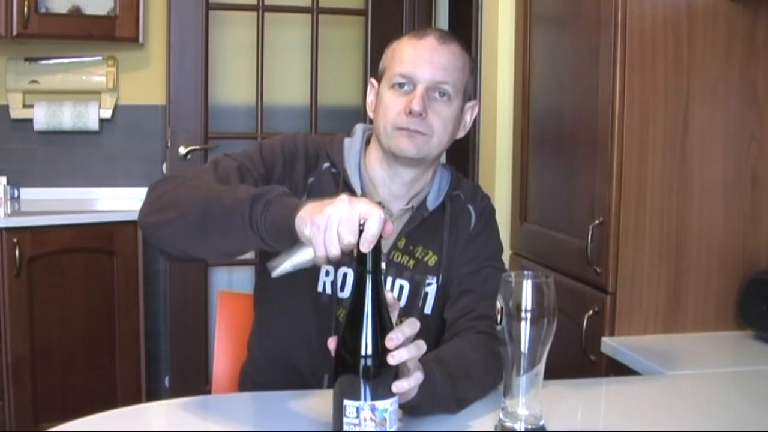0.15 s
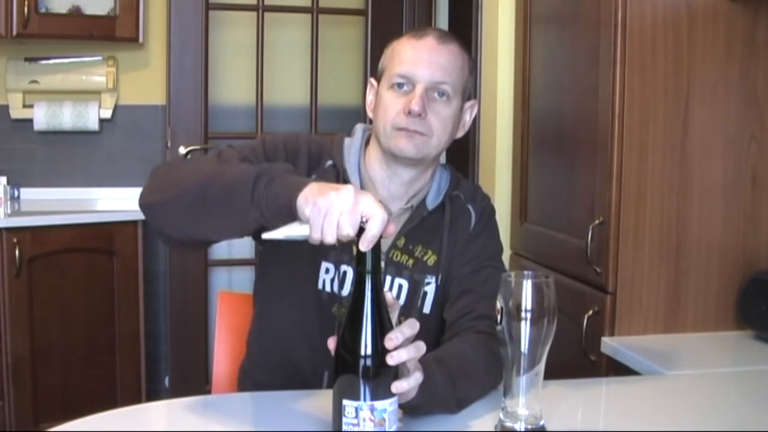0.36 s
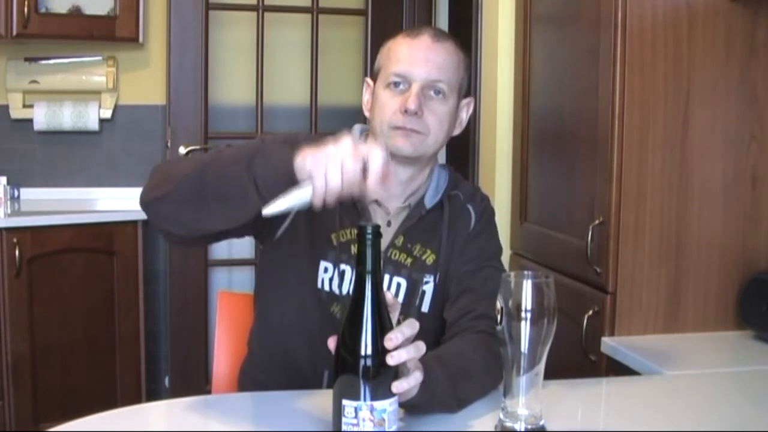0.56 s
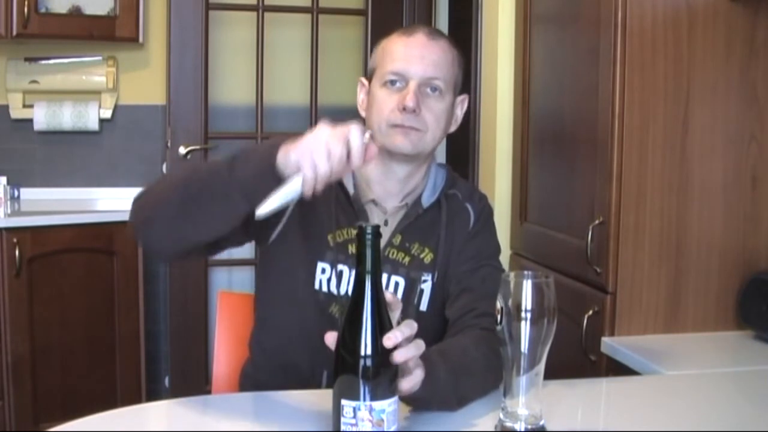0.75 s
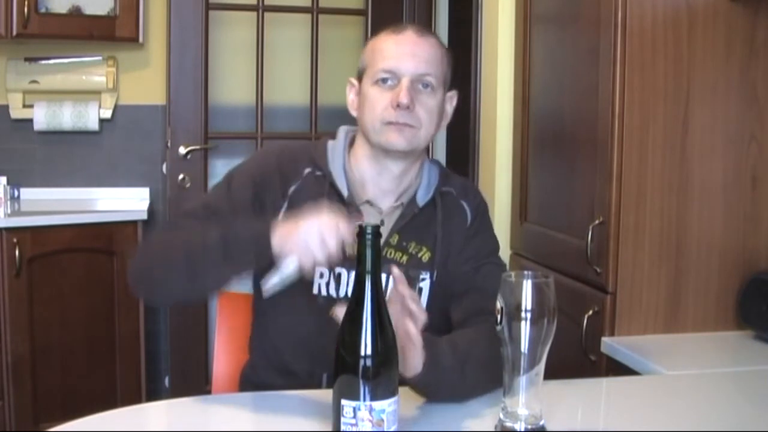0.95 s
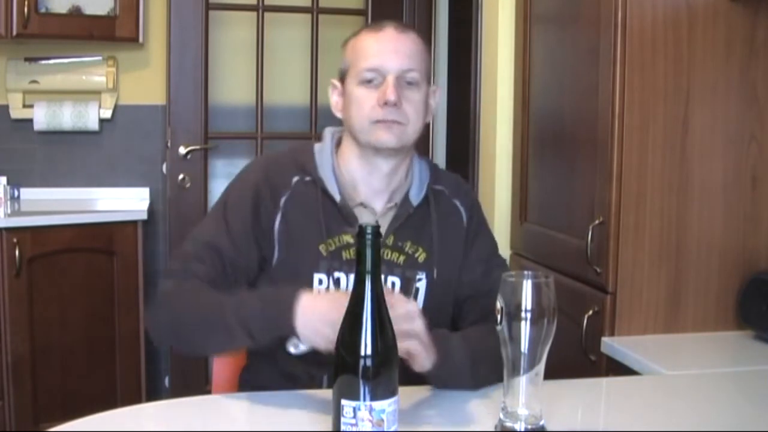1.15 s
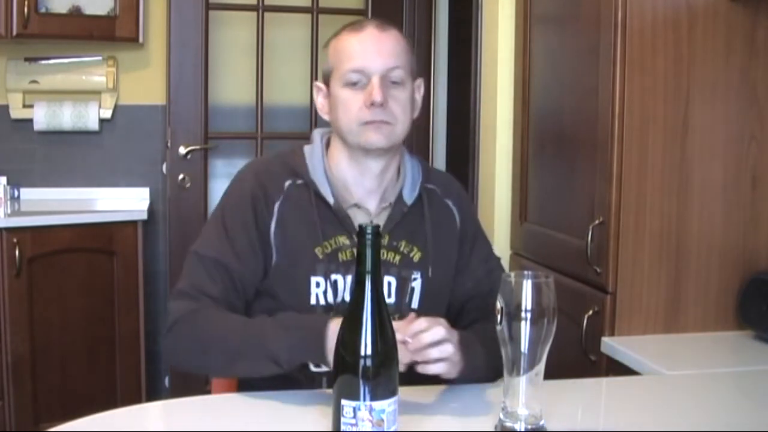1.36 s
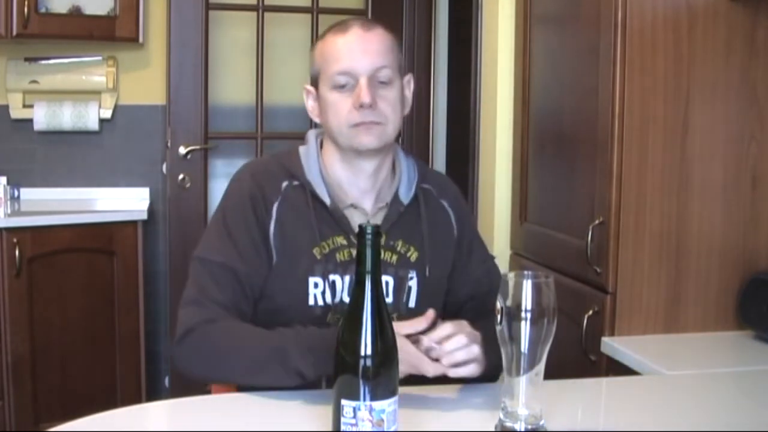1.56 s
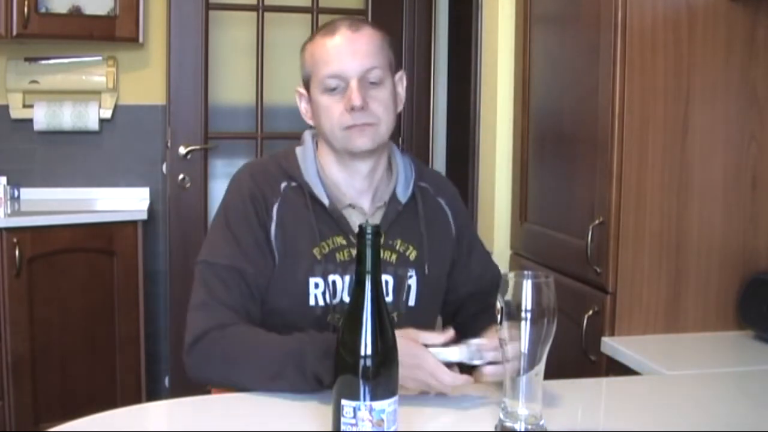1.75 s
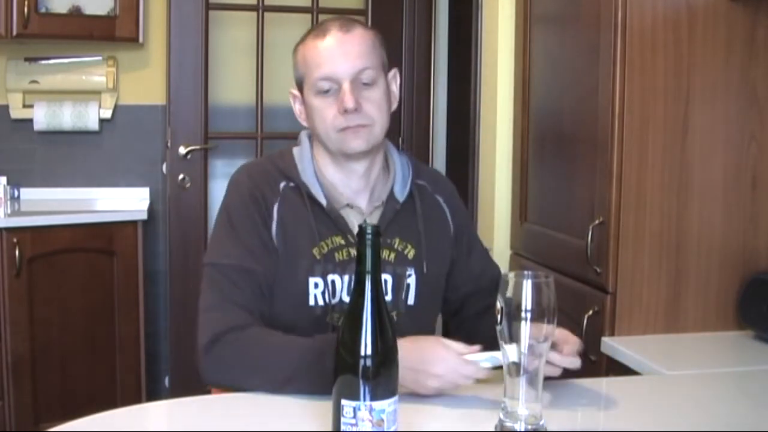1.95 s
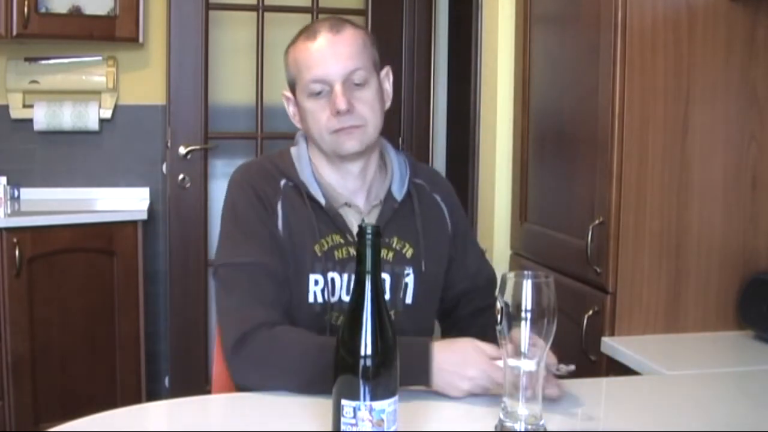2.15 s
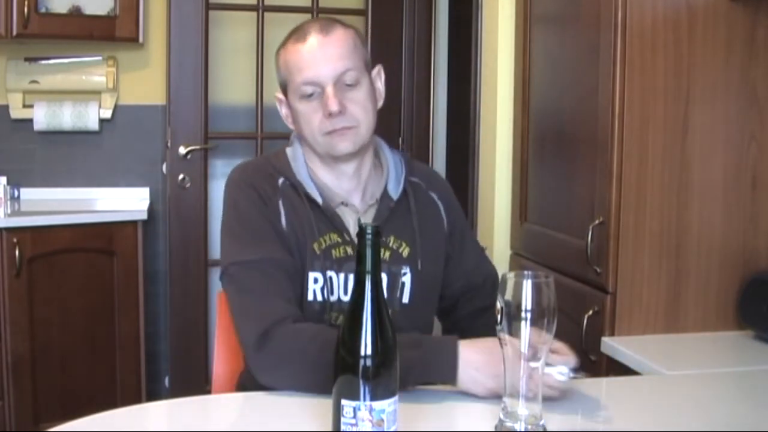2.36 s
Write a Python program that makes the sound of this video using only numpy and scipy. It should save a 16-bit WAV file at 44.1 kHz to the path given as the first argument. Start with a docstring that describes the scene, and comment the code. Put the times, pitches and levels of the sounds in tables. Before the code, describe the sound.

Sharp bottle-opening pop with a gassy burst, followed by small metallic clicks and a table clack

```python
"""A hard-walled kitchen: a crown cap pops off a glass bottle, clicks against the opener and is put down.
Gas and contacts are shaped noise and impulses ringing resonances; the walls answer each as decaying noise.
Above the bass and below the top treble the walls outweigh the direct sound at the stereo microphone.
Behind: a low thump, a sliding opener, sleeve rustle, soft low swells and the hum of a fridge and the camera.
The camera's limiter squeezes the pop."""
import sys
import numpy as np
from scipy import signal
from scipy.fft import rfft, irfft, next_fast_len
from scipy.io import wavfile
from scipy.ndimage import uniform_filter1d, map_coordinates

SR = 44100
rng = np.random.default_rng(int(sys.argv[2]) if len(sys.argv) > 2 else 0)


def materialize(psi):
    """Save the field psi as 16-bit PCM at rate SR to the path in sys.argv[1].

    A 1-D psi becomes a single channel; in a 2-D psi each row is a channel.
    """
    bounded = np.clip(np.atleast_2d(psi).T, -1, 1)
    quanta = np.round(bounded * 32767).astype(np.int16)
    wavfile.write(sys.argv[1], SR, quanta)


def volts_from_db(level):
    """Convert decibel levels to linear amplitude ratios."""
    exponent = np.asarray(level, float) / 20
    return 10 ** exponent


N = 110250
T = np.arange(N) / SR
POP_S = 0.2486  # moment the cap lets go


def unit(x):
    """Scale to rms 1."""
    return x / np.sqrt(np.mean(x ** 2) + 1e-20)


def along(points, hz):
    """Interpolate (frequency [Hz], value) points on a log frequency axis."""
    f, value = np.transpose(points)
    return np.interp(np.log(hz + 1), np.log(f + 1), value)


def filtered(x, response):
    """Multiply the spectrum of x by a response of frequency."""
    m = next_fast_len(x.shape[-1] + SR // 4)
    spectrum = rfft(x, m) * response(np.fft.rfftfreq(m, 1 / SR))
    return irfft(spectrum, m)[..., :x.shape[-1]]


def causal(gain):
    """Minimum-phase response with this gain: its sound never precedes the impulse."""
    def response(hz):
        cepstrum = irfft(np.log(gain(hz) + 1e-6))
        half = len(cepstrum) // 2
        folded = np.concatenate([cepstrum[:1], 2 * cepstrum[1:half], 0 * cepstrum[half:]])
        return np.exp(rfft(folded, len(cepstrum)))[:len(hz)]
    return response


def resonances(rows):
    """Sum of band-pass resonances with alternating signs."""
    def response(f):
        total = 0
        for k, (centre, width, db) in enumerate(rows):
            total = total + (-1) ** k * volts_from_db(db) * 1j * f * width / (centre * centre - f * f + 1j * f * width)
        return total
    return response


def ringing(rows):
    """Causal body whose resonances add in power and fall steeply outside."""
    def gain(f):
        power = 0
        for centre, width, db in rows:
            # each resonance is squared, which narrows it: widen it and halve its dB first
            power = power + np.abs(resonances([(centre, 1.5 * width, db / 2)])(f)) ** 4
        return np.sqrt(power)
    return causal(gain)


def even(x):
    """Smooth away the chance notches of a short burst, causally."""
    m = next_fast_len(8 * len(x))
    size = np.abs(rfft(x, m))
    floor = 0.38 * size.mean()
    return filtered(x, causal(lambda hz: 1 / np.interp(hz, np.fft.rfftfreq(m, 1 / SR), size + floor)))


def pair(x, alike, colour_db):
    """Mix two coloured noises to left and right with the given likeness (correlation) by frequency."""
    def spread(hz):
        turn = np.arccos(np.clip(along(alike, hz), -1, 1)) / 2
        return volts_from_db(colour_db(hz)) * [np.cos(turn), np.sin(turn)]
    mid, side = filtered(x, spread)
    return np.array([mid + side, mid - side])


def hit(db, response):
    """One sharp contact with a faint rattle, through a body that takes a moment to speak."""
    rattle_db, contact_t60_s, contact_rise_s = -13, 0.0058, 0.00016
    t = T[:SR // 20]
    rattle = volts_from_db(rattle_db - 60 * t / contact_t60_s) * rng.standard_normal(len(t))
    push = even((t == 0) + rattle)
    push = push / np.linalg.norm(push)
    # the level is the peak that a bare impulse would give
    peak = np.abs(filtered(1. * (t == 0), response)).max()
    return volts_from_db(db) * filtered(push, response) * (1 - np.exp(-t / contact_rise_s)) / peak


# spectrum of the escaping gas: (frequency [Hz], relative density [dB per Hz])
GAS_COLOUR = [(24, -80.5), (40, -19.5), (130, -15.5), (171, -7), (305, -13.5), (733, -9.5), (918, -18),
              (1090, -7.5), (2150, -8.5), (2630, -1.5), (3560, -7), (9690, -5.5), (16000, -23.5)]
# bottle resonances: (frequency [Hz], width [Hz], level over the gas [dB])
BOTTLE_RESONANCES = [(175, 22, 3.5), (251, 10, 7), (474, 20, 5.5), (720, 98, 8.5), (1053, 47, 10.5),
                     (2003, 110, 9), (2627, 26, 12.5), (3135, 300, 0), (4090, 170, 2.5), (5700, 340, -1.5)]


def pop():
    """Gas bursts out under the cap as decaying noise and sets the bottle ringing."""
    level_db, rise_s, t60_s = -1, 0.0005, 0.05  # level: rms where the envelope is 1
    lead_s = 8 * rise_s  # room for the onset
    t = T[:SR // 10] - lead_s
    burst = volts_from_db(-60 * np.maximum(t, 0) / t60_s) / (1 + np.exp(-t / rise_s))

    def colour(hz):
        # less the walls' colour, which their answer brings back
        gas = volts_from_db(along(GAS_COLOUR, hz) - along(WALL_LEVEL, hz))
        return gas * (1 + np.abs(resonances(BOTTLE_RESONANCES)(hz)))

    gas = filtered(even(rng.standard_normal(len(t)) * burst), causal(colour))
    gas = gas / np.sqrt(np.sum(gas ** 2) / np.sum(burst ** 2))
    out = np.zeros((2, N))
    place_in_kitchen(out, POP_S - lead_s, volts_from_db(level_db) * gas)
    return out


def thump():
    """Low push of the released pressure: a heavily damped swing."""
    hz, level_db, t60_s = 85, -26.5, 0.12
    t = np.maximum(T - POP_S, 0)
    return volts_from_db(level_db - 60 * t / t60_s) * np.sin(2 * np.pi * hz * t)


# cap clicking on steel, direct sound:
# (time [s], nominal peak level [dB], dull knock [dB], middle modes [dB], high modes [dB])
CAP_CLICKS = [(0.8357, -44.5, -3, -7.5, -8.5), (1.0073, -40, -12.5, -8.5, -12.5),
              (1.049, -43, -5, -14, -28), (1.0962, -27.5, -10, -10.5, -7.5),
              (1.1578, -28.5, -10.5, -13.5, -17.5), (1.1656, -32, -7, -3.5, -5),
              (1.1782, -32.5, -14.5, -6.5, -11.5), (1.3136, -23.5, -25.5, -12.5, -9.5),
              (1.3206, -25.5, -12, -10, -4.5), (1.3998, -35.5, -21, -0.5, -7), (1.5696, -54, -8, 5, 6.5)]
# cap modes in four groups, knock, low, middle, high: (frequency [Hz], width [Hz], level [dB])
CAP_MODES = [
    [(1640, 650, -0.5)],
    [(2090, 360, -2), (2642, 260, 1.5), (3210, 400, -3)],
    [(4190, 990, 0.5), (4840, 380, 4)],
    [(7600, 720, 1), (8400, 330, 3), (11100, 850, -10), (13000, 690, -8.5)],
]
# cap lands on the table and rocks, direct sound: (time [s], nominal peak level [dB])
CAP_LANDINGS = [(2.2442, -10.5), (2.2664, -33.5)]
# modes heard at the landing: (frequency [Hz], width [Hz], level [dB])
LANDING_MODES = [(900, 220, -19), (1566, 430, -11), (2110, 500, -10.5), (2880, 1040, -5), (3860, 560, -1.5),
                 (4550, 480, -1), (4910, 320, 2), (6500, 360, -4), (7680, 916, 2), (9800, 1600, -13),
                 (11600, 910, -13.5)]


def cap():
    """Each click rings the cap's mode groups with its own strengths; landing rings its own modes."""
    out = np.zeros((2, N))
    for time_s, db, knock_db, middle_db, high_db in CAP_CLICKS:
        rows = []
        for group, extra_db in zip(CAP_MODES, (knock_db, 0, middle_db, high_db)):
            for hz, width, mode_db in group:
                rows.append((hz, width, mode_db + extra_db + rng.normal(0, 1)))
        place_in_kitchen(out, time_s, hit(db, ringing(rows)))
    for time_s, db in CAP_LANDINGS:
        place_in_kitchen(out, time_s, hit(db, ringing(LANDING_MODES)))
    return out


# spectrum of the sliding opener: (frequency [Hz], relative density [dB per Hz])
SLIDE_SPECTRUM = [(1470, -38), (2500, -17.5), (3430, -6.5), (4070, -12.5), (6060, -3), (10500, -15),
                  (15000, -30.5)]
# opener taps, direct sound: (time [s], nominal peak level [dB], low body [dB])
OPENER_TAPS = [(1.9438, -28, -11), (1.9485, -21.5, 4)]
# low body and bright ring of a tap: (frequency [Hz], width [Hz], level [dB])
TAP_LOW_MODES = [(800, 340, -14), (1414, 930, -1)]
TAP_BRIGHT_MODES = [(3440, 1200, -7.5), (5270, 1000, 0.5), (7230, 1600, 2), (8350, 910, -0.5),
                    (12100, 1800, -6.5)]


def opener():
    """A short swelling slide of grainy rubbing noise that ends in two ringing taps."""
    start_s, end_s = 1.918, 1.946
    end_db, swell_db, grain_db = -50, 14.6, 6.4
    out = np.zeros((2, N))
    n = round((end_s - start_s) * SR)
    rub = rng.standard_normal(n) * volts_from_db(grain_db * rng.standard_normal(n))
    rub = unit(filtered(rub, lambda hz: volts_from_db(along(SLIDE_SPECTRUM, hz))))
    place_in_kitchen(out, start_s, rub * volts_from_db(end_db - swell_db * np.linspace(1, 0, n)))
    for time_s, db, body_db in OPENER_TAPS:
        body = [(hz, width, mode_db + body_db) for hz, width, mode_db in TAP_LOW_MODES]
        place_in_kitchen(out, time_s, hit(db, ringing(TAP_BRIGHT_MODES + body)))
    return out


# decay of the kitchen: (frequency [Hz], t60 [s])
KITCHEN_T60 = [(100, 0.85), (500, 0.65), (1300, 0.65), (3500, 0.52), (9000, 0.37), (15000, .25)]
# the walls at the microphone: (frequency [Hz], room energy over direct [dB])
WALL_LEVEL = [(100, 1.5), (1000, 7.5), (3000, 13), (8000, 4), (15000, -2)]
# stereo likeness of the room: (frequency [Hz], left-right correlation [-1 to 1])
ROOM_LIKENESS = [(60, 0.69), (240, 0.94), (950, 0.8), (3770, 0.79), (15000, 0.61)]


def place_in_kitchen(out, time_s, x):
    """Add a direct sound and the walls' answer: a fresh draw of noise that decays by frequency."""
    builds_s, right_over_left_db = 0.0021, 1.9
    uneven_db, blend_s = 2, 0.02  # early echoes come unevenly, then blend
    t = T[:SR]
    hz, frame_s, z = signal.stft(rng.standard_normal((2, SR)), SR, nperseg=256)
    t60 = along(KITCHEN_T60, hz)[:, None]
    # dividing by the root of t60 gives every band the same energy
    tail = signal.istft(z * volts_from_db(-60 * frame_s / t60) / np.sqrt(t60), SR, nperseg=256)[1][:, :SR]
    tail = pair(tail / np.linalg.norm(tail[0]), ROOM_LIKENESS, lambda f: along(WALL_LEVEL, f))
    lumps = unit(uniform_filter1d(rng.standard_normal(SR), size=40))
    tail = tail * volts_from_db(uneven_db * lumps * np.exp(-t / blend_s))
    tail = tail * (1 - np.exp(-(t / builds_s) ** 2))
    wet = signal.fftconvolve(x[None], tail, axes=1)
    both = wet + np.pad(x, (0, SR - 1))
    both = both * volts_from_db([[-right_over_left_db / 2], [right_over_left_db / 2]])
    segment = out[:, round(time_s * SR):][:, :both.shape[1]]
    segment += both[:, :segment.shape[1]]


# sleeve rustle: (time [s], rms level [dB])
RUSTLE_LEVEL = [(1.45, -93), (1.57, -67.5), (1.65, -86.5), (1.78, -85), (1.85, -67), (1.92, -77),
                (2.1, -68), (2.24, -65), (2.35, -90)]
# spectrum of the cloth: (frequency [Hz], relative density [dB per Hz])
CLOTH_COLOUR = [(1500, -34), (3000, 9), (6000, 3), (11000, -3.5), (16000, -13.5)]


def sleeve():
    """Faint cloth noise as the arms move, grainy because each sample has its own random strength."""
    rub = rng.standard_normal((2, N)) * volts_from_db(3 * rng.standard_normal(N))
    cloth = unit(pair(rub, ROOM_LIKENESS, lambda hz: along(CLOTH_COLOUR, hz)))
    return cloth * volts_from_db(np.interp(T, *np.transpose(RUSTLE_LEVEL), -120, -120))


# soft low tones: (centre time [s], length [s], frequency [Hz], rms level at the crest [dB])
LOW_SWELLS = [(0.512, 0.038, 257, -46), (0.888, 0.069, 215, -60), (0.984, 0.18, 216.8, -62.5)]


def swells():
    """Brief soft low sines that swell and fade as bell curves."""
    out = 0
    for time_s, length_s, hz, db in LOW_SWELLS:
        bell = np.exp(-(2 * (T - time_s) / length_s) ** 2)
        out = out + np.sqrt(2) * volts_from_db(db) * bell * np.sin(2 * np.pi * hz * T)
    return out


# spectrum of the room and camera noise: (frequency [Hz], relative density [dB per Hz])
HUSH_COLOUR = [(15, -60), (25, -33.5), (48, -3), (120, -22), (157, -8.5), (217, -6), (249, -16), (394, -8),
               (476, -8.5), (1040, -15.5), (2160, -21), (2610, -18), (3430, -27), (9070, -34),
               (16000, -41.5)]
# its course: (time [s], rms level [dB])
HUSH_COURSE = [(0, -61), (.7, -57.5), (1.5, -58), (2.5, -59.5)]
# its stereo likeness: (frequency [Hz], left-right correlation [-1 to 1])
HUSH_LIKENESS = [(60, -0.23), (150, 0.39), (380, -0.79), (950, -0.56), (2380, 0.11), (5980, 0.64),
                 (15000, 0.27)]
# motor tones: (frequency [Hz], rms level about which each wavers [dB])
MOTOR_TONES = [(58, -72.5), (150, -77.5), (204.6, -76.5), (1039, -86.5), (2552, -79), (3068, -81),
               (4113, -81), (9146, -87), (9351, -88.5)]


def hush():
    """Coloured room and camera noise with motor tones that waver in level and drift in phase."""
    waver_db, waver_hz = 4.5, 12
    noise = unit(pair(rng.standard_normal((2, N)), HUSH_LIKENESS, lambda hz: along(HUSH_COLOUR, hz)))
    out = noise * volts_from_db(np.interp(T, *np.transpose(HUSH_COURSE)))
    for hz, db in MOTOR_TONES:
        drift = np.cumsum(rng.standard_normal(N)) * 0.03
        waver = map_coordinates(rng.standard_normal(40), [T * waver_hz])
        start = rng.uniform(0, 0.31, (2, 1))  # left and right differ slightly in phase [rad]
        tone = np.sin(2 * np.pi * hz * T + drift + start)
        out = out + np.sqrt(2) * volts_from_db(db + waver_db * waver) * tone
    return out


def scene():
    """All sources together at the microphone."""
    return pop() + thump() + cap() + opener() + sleeve() + swells() + hush()


def low_pass(x):
    """Removes everything above the highest recorded frequency."""
    return signal.sosfilt(signal.butter(12, 16620, fs=SR, output="sos"), x)


def record(dry):
    """Microphone without deep bass, a limiter that clamps in milliseconds and lets go, soft saturation."""
    mic_low_hz, saturation = 45, 0.52
    limit_db, attack_s, release_db_per_s = -17.5, 0.0084, 61  # limit on the rms level
    heard = filtered(dry, lambda hz: (1j * hz / (mic_low_hz + 1j * hz)) ** 2)
    n = max(round(attack_s * SR), 2)
    power = signal.lfilter(np.ones(n) / n, 1, np.mean(heard ** 2, axis=0))
    over_db = np.maximum(10 * np.log10(np.abs(power) + 1e-12) - limit_db, 0)
    # hold the highest cut so far, let go steadily in dB
    released_db = release_db_per_s * T
    cut_db = np.maximum.accumulate(over_db + released_db) - released_db
    mix = saturation * np.tanh(heard * volts_from_db(-cut_db) / saturation)
    return low_pass(mix)


dry = scene()
out = record(dry)
materialize(out)
```